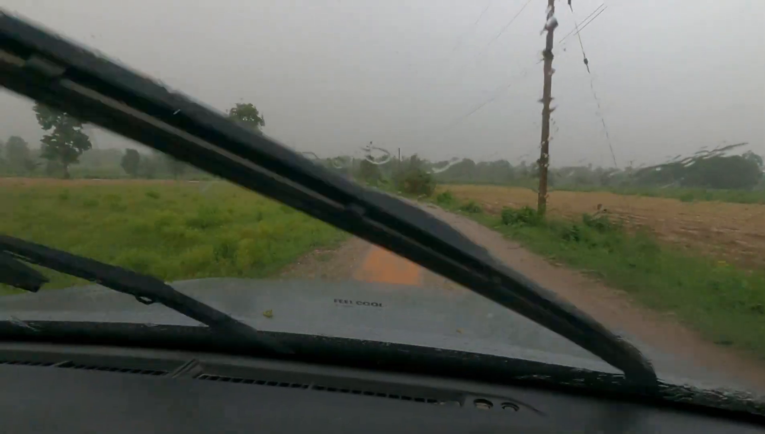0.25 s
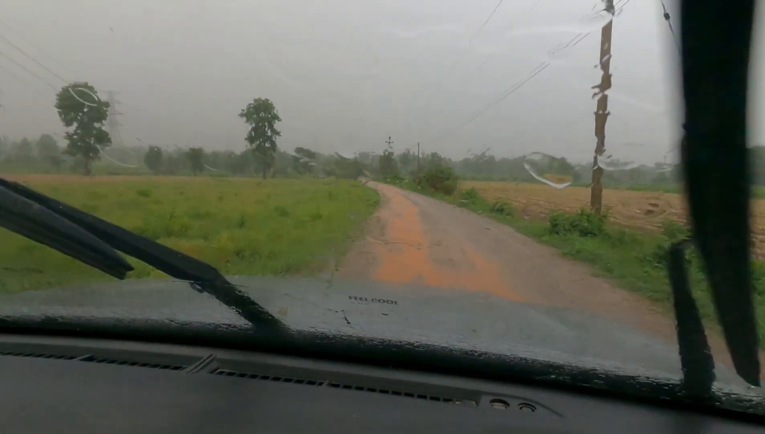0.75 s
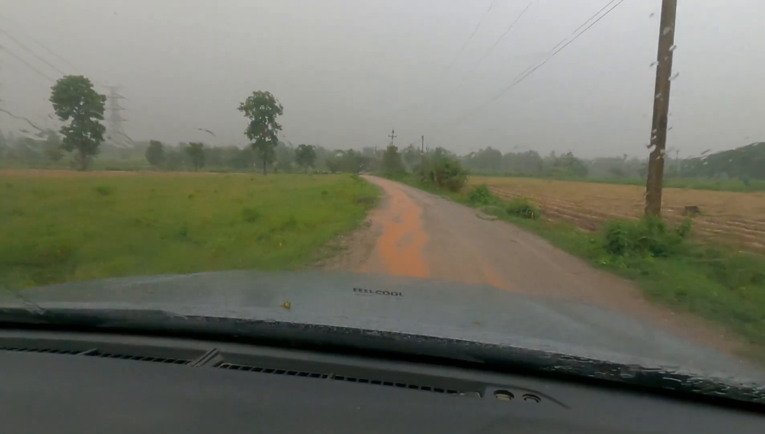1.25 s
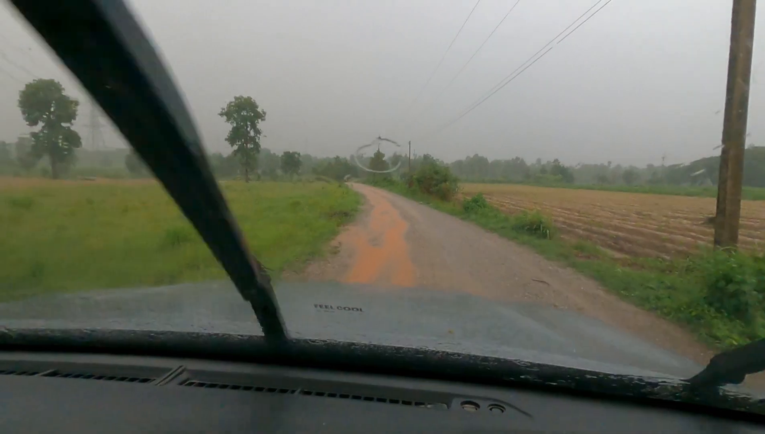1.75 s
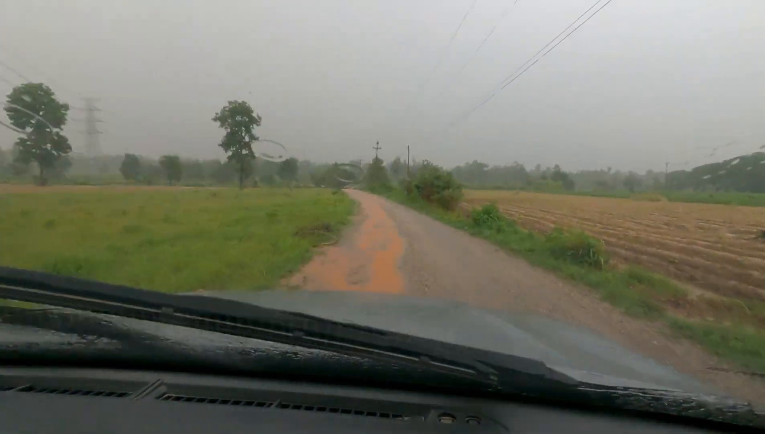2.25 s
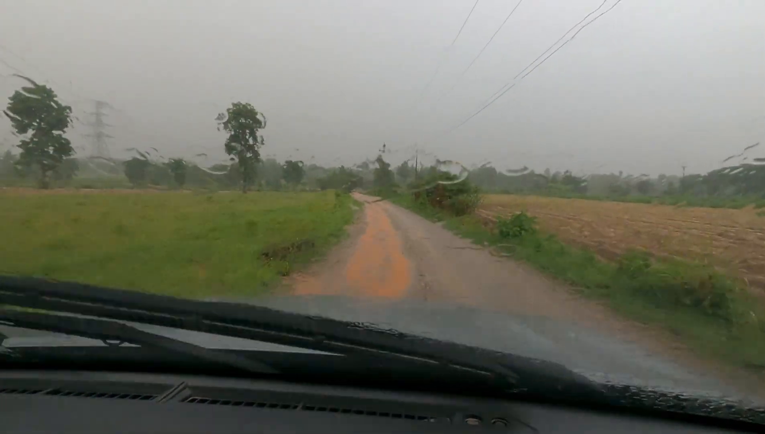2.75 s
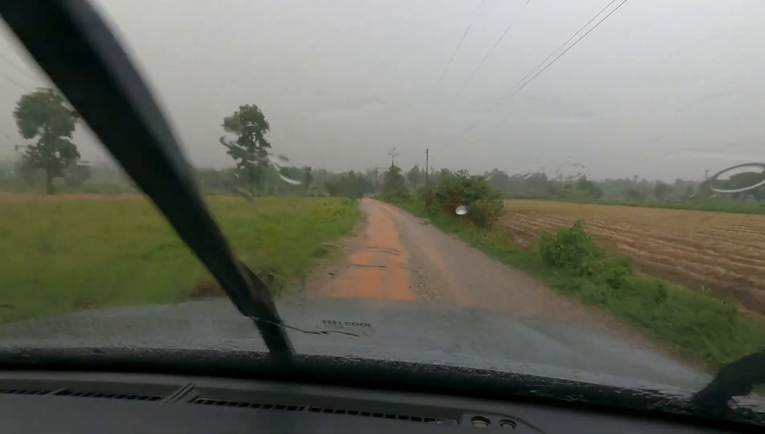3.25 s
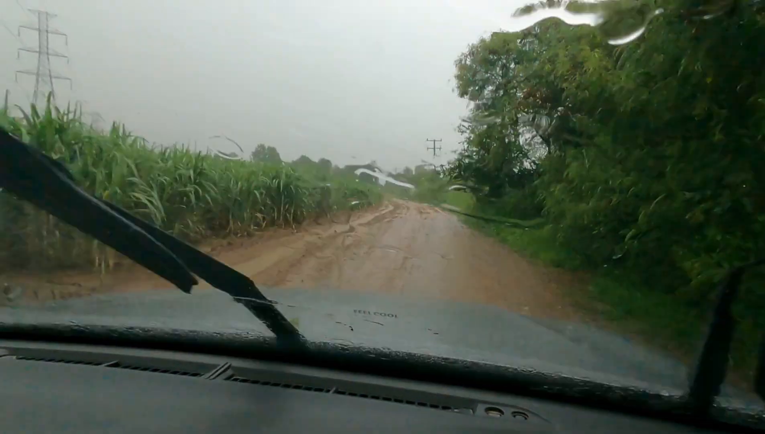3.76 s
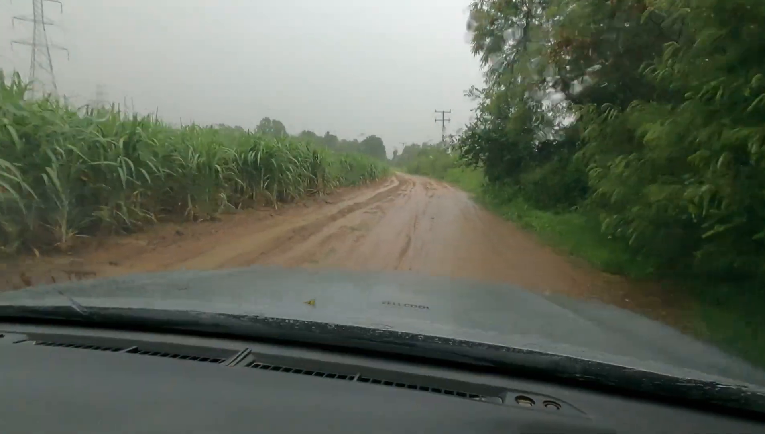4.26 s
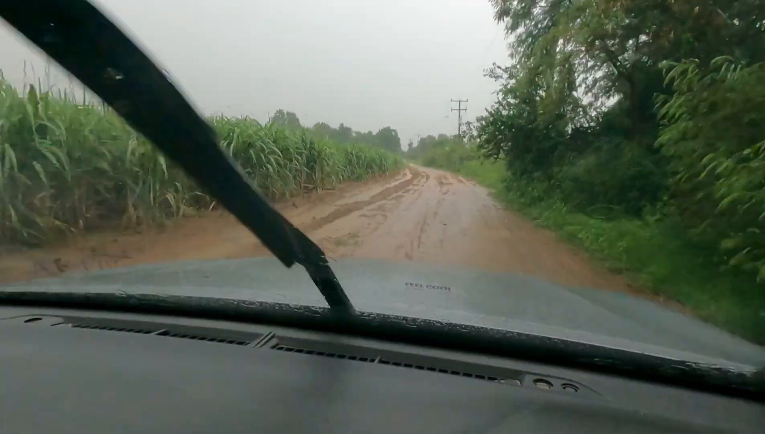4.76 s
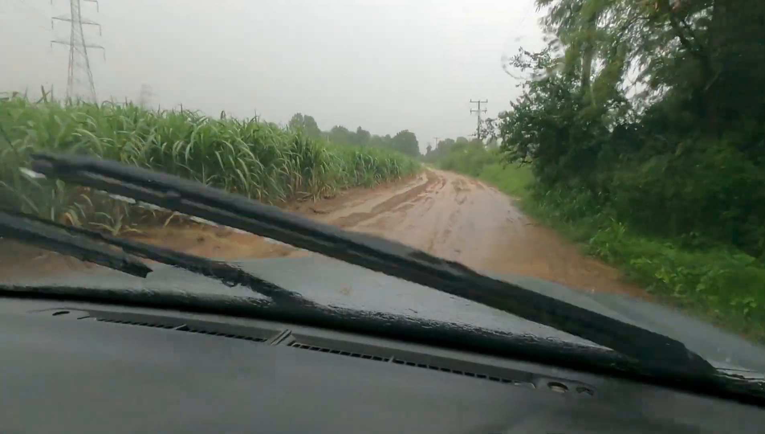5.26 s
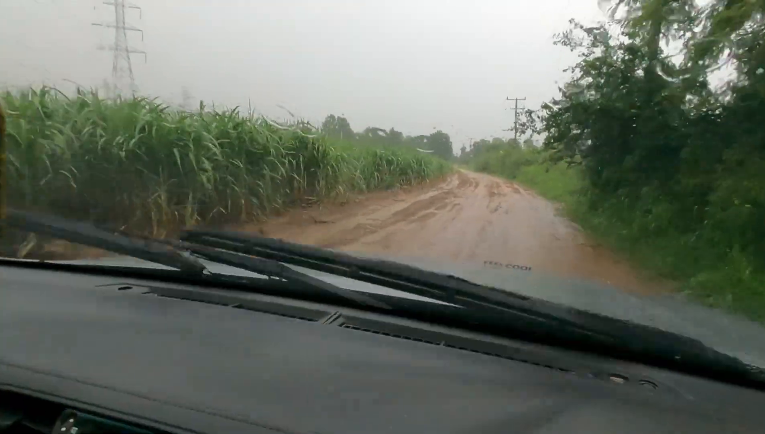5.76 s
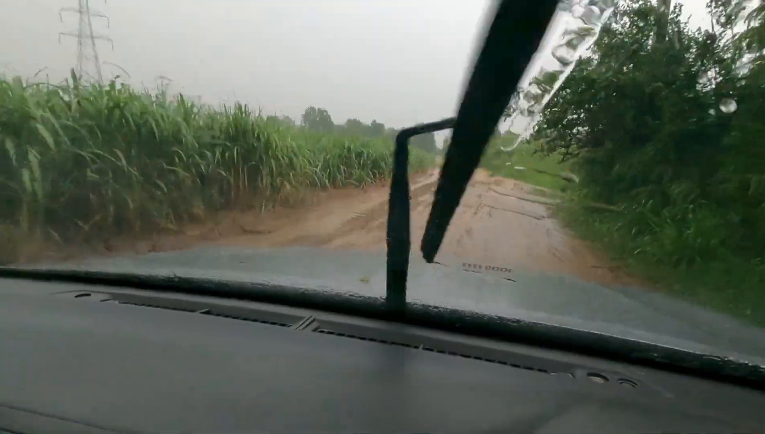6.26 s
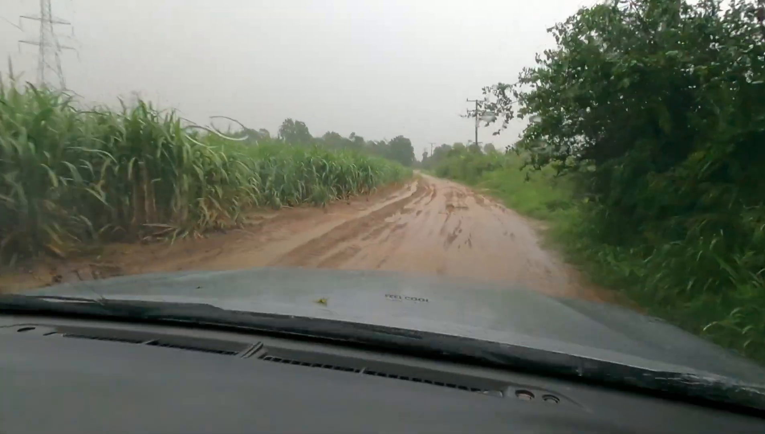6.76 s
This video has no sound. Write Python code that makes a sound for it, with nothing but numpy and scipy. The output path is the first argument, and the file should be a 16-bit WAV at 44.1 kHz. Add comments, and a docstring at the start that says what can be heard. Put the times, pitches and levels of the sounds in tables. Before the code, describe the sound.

From 0 s, steady heavy rain fills a small, padded car cabin, heard from the dashboard: a dense, fairly smooth hiss with thousands of tiny splashes and ticks, over a low, loosely wavering engine hum around 40 Hz and its multiples. Dull, quick double knocks of wipers land at about 0.9, 2.2 and 3.5 s, with slight boom swells about 0.6 s before each. Soft low thuds appear now and then; very faint high rubber hiss comes around 1.8-2.4 s. Larger drops cluster near 2.8-3.0 s. At 3.73 s everything cuts to silence, except a few milliseconds of thin rain at 3.89 s. From 4.0 s a louder, fuller stretch fades in within 0.06 s, strongest around 4.2-4.6 s, with crisp drops and an engine boom peaking near 4.3 s. It then eases, with wiper knocks at 5.2 and 6.55 s and scattered drops until the end, about 7 s.

```python
"""Inside a car crawling along a dirt road in heavy rain: coloured noise and thousands of tiny splashes make the
wash, pitched rings with short spatters make the nearer drops, and drifting low tones make the engine boom.
Wipers knock by ringing a panel at the foot of each sweep; wet rubber hisses, and short low rings make soft thuds.
Midway the sound cuts out, a sliver slips through, and a louder stretch of road fades in."""
import sys
import numpy as np
from scipy import signal
from scipy.io import wavfile
from scipy.ndimage import uniform_filter1d

SR = 44100
rng = np.random.default_rng(int(sys.argv[2]) if len(sys.argv) > 2 else 0)


def generate_wav(signal):
    """Clip the signal to [-1, 1] and save it as 16-bit WAV at the path in sys.argv[1]."""
    frames = np.transpose(np.atleast_2d(signal))
    scaled = np.clip(frames, -1, 1) * 32767
    pcm = np.round(scaled).astype(np.int16)
    wavfile.write(sys.argv[1], SR, pcm)


N = 309141
SLIVER_END_S = 3.8908  # the second stretch of road takes over the rain colour here

# how hard it rains, one table a stretch of road: start_s, level_db,
# low_db (tilt under about 900 Hz), spray_db (tilt around 7 kHz)
RAIN_LEVELS = [
    [(0.0, -28, 3.5, -5), (0.2, -25, -1.5, -3), (0.74, -27, 1.5, -1), (1.2, -26.5, 1, 0.5),
     (1.75, -25.5, 0.5, 3), (2.05, -26.5, 3.5, 0.5), (2.3, -26.5, 1, 0.5), (2.5, -26.5, 1, 2.5),
     (2.65, -27, 0.5, 1.5), (2.75, -24, 0.5, 1.5), (3.0, -27, 1.5, 2), (3.35, -26, 0.5, 2),
     (3.72, -28, 1.5, 2.5), (3.86, -28.5, -12.5, 9), (3.92, -28, -9.5, 6.5)],
    [(4.0, -32, -1.5, -6), (4.1, -24, 2, -10), (4.2, -21, -1, -1), (4.27, -22.5, 1, -6),
     (4.35, -22.5, -1, 0), (4.48, -22, -1, -3), (4.6, -22.5, 0, 0), (4.72, -25, -1, 1.5),
     (5.0, -26, -0.5, -1.5), (5.4, -27.5, -2, -1.5), (5.65, -25.5, -1, -1.5), (5.78, -26, 0.5, 1.5),
     (5.88, -26, 1.5, 1), (6.05, -27.5, -1.5, 0), (6.2, -27.5, -1.5, -0.5), (6.55, -27.5, 0.5, -1),
     (7.0, -27.5, 0, -0.5)],
]
# wipers landing at the foot of a sweep: hit_s, level_db, lowest_mode_db, upper_tuning_ratio,
# first_blade_lead_s, first_blade_db (against the second), rebound_after_s, rebound_db,
# slack_lead_s (linkage taken up ahead of the first blade), slack_db, first_blade_sharpness_db
WIPER_KNOCKS = [(0.879, -11, -13, 0.94, 0.0064, -8, 0.015, -7.5, 0.0066, -14, 5),
                (2.1972, -11, -5, 0.93, 0.0044, -3.5, 0.023, -12.5, 0.008, -11, 1),
                (3.5137, -12, -11, 1.04, 0.0042, -2, 0.019, -11, 0.0095, -9.5, -1),
                (5.2333, -13.5, -2, 0.94, 0.00425, -2.5, 0.016, -6.5, 0.0093, -4.5, 1.5),
                (6.5548, -11.5, -8, 0.99, 0.0088, -8.5, 0.00267, -5.5, 0.006, -6, 6.5)]


def gain_of(db):
    """Decibels to an amplitude factor."""
    return 10 ** (np.asarray(db) / 20)


def evened(x):
    """Scales to rms 1."""
    return x / np.sqrt(np.mean(x ** 2) + 1e-20)


def read(points, hz):
    """Reads a spectrum in dB, interpolated along a log frequency axis."""
    f, value = np.transpose(points)
    return np.interp(np.log(hz + 1), np.log(f + 1), value)


def column(tables, t, order):
    """Reads one column of the joined road tables at times t."""
    rows = np.vstack(tables)
    return np.interp(t, rows[:, 0], rows[:, order])


def add(mix, s, sound):
    """Mixes a sound in at time s."""
    part = mix[round(s * SR):][:len(sound)]
    part += sound[:len(part)]


def blobs(frames, bins, long, wide):
    """A random time-frequency field of soft patches, rms 1."""
    field = rng.standard_normal((frames, bins)).T
    across_bins = uniform_filter1d(field, wide, 0)
    return evened(uniform_filter1d(across_bins, long, 1))


def ring(hz, cycles, glide, size=600):
    """A splash: soft start, a few cycles dying away, a slight pitch glide; size in samples."""
    u = np.arange(size) / SR * hz / cycles
    swell = 4 * u * np.exp(1 - 4 * u)  # peaks at 1
    return swell * np.sin(2 * np.pi * cycles * u * (1 + glide * u))


def echoed(x, t60_s=.04, wet_db=-7.):
    """The small padded cabin: a short tail of sparse reflections."""
    taps = np.zeros(4000)
    at = np.arange(40, 3980, 20) + rng.integers(0, 20, 197)
    taps[at] = rng.choice([-1., 1.], len(at)) * gain_of(-60 * at / SR / t60_s)
    tail = signal.oaconvolve(x, taps / np.linalg.norm(taps))[:N]
    return x + gain_of(wet_db) * tail


def shower(splashes_per_s=7000., ticks_per_s=200., spread_db=2.7, cycles=1.8, tick_db=-11.5, wash_db=2.0):
    """Splashes of many pitches and hard ticks over a smooth wash, before the cabin colours them."""
    size = gain_of(spread_db * np.minimum(rng.exponential(1, N), 5))
    size = size * (rng.random(N) < splashes_per_s / SR)
    kind, splashes = rng.integers(0, 32, N), np.zeros(N)
    for k, hz in enumerate(np.geomspace(1200, 9000, 32)):
        splash = ring(hz, cycles * rng.uniform(0.53, 2.14), rng.uniform(-0.25, 0.49))
        splashes += signal.oaconvolve(size * (kind == k), np.sqrt(hz) * evened(splash))[:N]

    hits = gain_of(4.0 * np.minimum(rng.exponential(1, N), 3)) * (rng.random(N) < ticks_per_s / SR)
    glass = signal.butter(2, 1200., "highpass", fs=SR, output="sos")
    ticks = gain_of(tick_db) * splashes.std() * evened(signal.sosfilt(glass, hits))

    # drops land in clumps of a few milliseconds
    clumps_db = 1.5 * evened(np.convolve(rng.standard_normal(N), np.hanning(350), "same"))
    drops = evened(echoed(gain_of(clumps_db) * (splashes + ticks)))
    return drops + gain_of(wash_db) * rng.standard_normal(N)


def level_flicker(t):
    """Small random flicker of the rain level in dB, as a sum of bell-shaped bumps."""
    # small random flicker of the rain level: middle_s, half_width_s, change_db
    bumps = [(0.08, 0.013, 2), (0.43, .015, 1), (0.6, 0.013, -1), (0.78, 0.013, -1), (1.15, .02, -1.5),
             (1.21, 0.017, 1), (1.75, .02, -3), (1.83, .02, 2), (1.93, 0.011, 1), (2.07, 0.016, -1),
             (2.27, .012, -2), (2.44, 0.011, -3), (2.54, 0.017, -1), (2.6, 0.026, 1), (2.7, 0.016, 1.5),
             (2.83, 0.011, -0.5), (2.97, 0.011, 1), (3.21, .015, 2), (3.58, .015, 1.5), (4.42, .015, -1),
             (4.71, .015, -1), (5.14, 0.03, -1), (5.37, 0.0099, -2.5), (5.46, 0.013, -0.5),
             (5.59, .015, -1), (5.74, .02, -0.5), (5.83, .012, 0.5), (5.94, 0.017, -0.5), (6.17, 0.028, -1),
             (6.23, 0.013, 0), (6.5, 0.011, 2), (6.61, 0.014, 2.5), (6.87, 0.0095, 0)]
    return sum(db * np.exp(-.5 * ((t - s) / half) ** 2) for s, half, db in bumps)


def rain(patchy_db=0.47, gusty_db=0.47, roof_hz=910.0, spray_hz=7220.0):
    """The shower through roof and glass; gusts flicker across wide bands, patches drift."""
    # colour of the rain in the cabin, one table a stretch of road: pitch_hz, density_db (dB per Hz)
    cabin_colour = [
        [(30, -4), (100, -11), (240, -7), (340, -9.5), (500, -8), (640, -12), (1250, -13), (1450, -11.5),
         (2000, -14.5), (3300, -13), (4300, -16), (5200, -21.5), (5700, -27), (6300, -33.5), (7000, -34.5),
         (7600, -37), (8450, -51), (8650, -57)],
        [(30, -9), (55, -8), (100, -6), (150, -7), (200, -6.5), (400, -3.5), (500, -5.5), (600, -6),
         (710, -4.5), (900, -9), (1250, -8.5), (1450, -9), (2500, -11.5), (3600, -10), (4900, -15.5),
         (5700, -22), (6300, -28), (7000, -37), (8450, -43), (8650, -62)],
    ]
    hz, t, z = signal.stft(shower(), SR, nperseg=1024, noverlap=768)
    # flatten the average spectrum so that the cabin alone sets the colour
    average_power = uniform_filter1d((abs(z) ** 2).mean(1), size=3)
    flat = z / np.sqrt(average_power)[:, None]

    colour_db = np.array([read(points, hz) for points in cabin_colour]).T
    colour_db = colour_db - 80 * (hz > 9000)[:, None]
    shape_db = colour_db[:, (t > SLIVER_END_S).astype(int)]

    roof = 1 / (1 + (hz / roof_hz) ** 4)
    spray = 1 / (1 + ((hz - spray_hz) / 850.) ** 4)
    shape_db = shape_db + np.outer(roof, column(RAIN_LEVELS, t, order=2))
    shape_db = shape_db + np.outer(spray, column(RAIN_LEVELS, t, order=3))

    patches = blobs(len(t), len(hz), long=10, wide=16)
    gusts = blobs(len(t), len(hz), long=3, wide=120)
    shape_db = shape_db + patchy_db * patches + gusty_db * gusts
    shape_db = shape_db + np.outer(1 - roof, level_flicker(t))  # the flicker spares the lows

    body = signal.istft(flat * gain_of(shape_db), SR, nperseg=1024, noverlap=768)[1][:N]
    return evened(body) * gain_of(column(RAIN_LEVELS, np.arange(N) / SR, order=1))


def big_drops(cycles=5.6, tail_db=3.0, tail_s=0.0043, spread=1.6, top_hz=5570.0):
    """Each large drop ticks on the glass and spatters around its own pitch; its top is cut away steeply."""
    # large single drops: start_s, level_db (of the tick), pitch_hz
    drop_hits = [(0.6783, -24, 3300), (0.7213, -25, 3260), (1.02, -26, 1480), (1.631, -23, 3350),
                 (1.958, -23.5, 3380), (2.296, -22, 3540), (2.36, -24, 3800), (2.405, -22.5, 3400),
                 (2.752, -22, 1800), (2.838, -22, 2600), (2.862, -24.5, 3600), (2.9778, -17, 3200),
                 (2.9, -27, 5200), (2.987, -27, 4100), (3.0046, -20, 1950), (3.0256, -21.5, 3500),
                 (3.167, -28.5, 1160), (4.078, -24.5, 1340), (4.161, -28, 1580), (4.203, -17, 3460),
                 (4.304, -13.5, 3700), (4.3181, -17, 2200), (4.352, -23, 1550), (4.4343, -17, 2920),
                 (4.575, -16.5, 1420), (4.697, -26, 1100), (4.829, -17, 2650), (5.003, -20, 2490),
                 (5.262, -17.5, 3650), (5.293, -25, 1430), (5.536, -29, 1490), (5.592, -16.5, 3040),
                 (5.628, -27, 1320), (5.7244, -19.5, 4600), (5.7438, -21, 1420), (5.829, -25, 2300),
                 (5.832, -19, 4470), (5.86, -28, 4200), (5.89, -19, 2640), (5.916, -25, 1490),
                 (6.14, -21, 4300), (6.393, -18, 4300), (6.539, -16.5, 2550), (6.8224, -25, 1500),
                 (6.862, -22, 3600), (6.873, -17.5, 2940)]
    out, t = np.zeros(N), np.arange(900) / SR
    for (s, db, hz), noise in zip(drop_hits, rng.standard_normal((len(drop_hits), 900))):
        band = signal.butter(2, [hz / spread, hz * spread], "bandpass", fs=SR, output="sos")
        spatter = signal.sosfilt(band, noise * np.exp(-t / tail_s))
        add(out, s, gain_of(db) * ring(hz, cycles, 0.019, size=900))
        add(out, s, gain_of(db + tail_db) * spatter)
    dull = signal.cheby2(8, 50, top_hz * 1.3, fs=SR, output="sos")
    return signal.sosfilt(dull, echoed(out))


def engine(firing_hz=39.96, middle_db=-40., sweep_s=1.25, turn_db=9.5, turn_s=0.073):
    """Multiples of the firing rate; the cabin booms on the upper ones, steadily under load, loosely otherwise."""
    # engine load, one table a stretch of road: start_s, boom_db, third_order_db (extra weight)
    engine_load = [
        [(0, -43.5, 3), (.4, -47.5, -2), (.57, -44, -4), (.72, -55, -4), (1.05, -56, 4), (1.25, -42, 0),
         (1.4, -57, 6), (1.75, -54, -2), (2.05, -39, 1), (2.5, -65, 1), (3.3, -49, -2), (3.7, -45, -4)],
        [(4.1, -37, -2), (4.21, -35, 6), (4.29, -22, -5), (4.38, -30, 5), (4.56, -34, -8), (4.62, -49, 0),
         (4.7, -38, 3), (4.9, -33.5, 2), (5.1, -40, 2), (5.25, -49, -2), (5.55, -41, -8), (5.75, -44, -2),
         (6.15, -45, -2), (6.4, -42, -1), (6.7, -38, 1), (7.0, -43.5, -3)],
    ]
    # orders: multiple, level_db (against middle_db, at middle load),
    # looseness_hz (width of each of two smoothers in a row), follow (of the load, 0-1)
    firing_orders = [(1, -8, 7.4, 0.15), (2, -5, 13, 0.05), (3, 1, 33, 0.37), (4, 3.5, 32, 0.66)]
    t, out = np.arange(N) / SR, np.zeros(N)
    # the boom swells as the wipers turn over at the top of the glass, half a sweep before the knock
    turning = sum(np.exp(-.5 * ((t - s + sweep_s / 2) / turn_s) ** 2) for s, *_ in WIPER_KNOCKS)
    load_db = column(engine_load, t, order=1) + turn_db * turning
    third_db = column(engine_load, t, order=2)
    steady = np.clip((load_db + 43) / 9, .15, .9)  # the share of pure tone grows with load

    drift = uniform_filter1d(uniform_filter1d(rng.standard_normal(N), size=9000), size=9000)
    turns = np.cumsum(firing_hz * (1 + 0.01549 * evened(drift))) / SR
    for multiple, db, width, follow in firing_orders:
        r = np.exp(-np.pi * width / SR)
        loose = rng.standard_normal(N) + 1j * rng.standard_normal(N)
        for _ in range(2):
            loose = signal.lfilter([1 - r], [1, -r], loose)
        wander = np.sqrt(steady) + np.sqrt(1 - steady) * loose / loose.std()
        tone = wander * np.exp(2j * np.pi * multiple * turns)
        level_db = db + middle_db + follow * (load_db - middle_db) + (multiple == 3) * third_db
        out += gain_of(level_db) * tone.real
    return out


def wipers(push_s=0.00012, low_hz=128.0, dull_db=9.5):
    """Each blow is a soft push that rings the panel below the glass; the panel radiates no deep bass."""
    # modes of the panel under the wipers: pitch_hz, level_db, t60_s
    panel_modes = [(171, -6, 0.06), (255, -6, 0.024), (397, 4, 0.033), (565, -3, 0.027), (710, -15, 0.014),
                   (913, -14.5, 0.012)]
    t, out = np.arange(5000) / SR, np.zeros(N)
    for (s, db, weight_db, tuning, lead, first_db, rebound_s, rebound_db,
         slack_s, slack_db, sharp_db) in WIPER_KNOCKS:
        modes = np.array([gain_of(d - 60 * t / t60) * np.sin(2 * np.pi * hz * (tuning if k else 1) * t)
                          for k, (hz, d, t60) in enumerate(panel_modes)])
        panel = gain_of(db) * (gain_of(weight_db) * modes[0] + modes[1:].sum(0))
        # the first blade and the rebound land duller, with extra lowest mode
        low = gain_of(db + dull_db) * modes[0]
        add(out, s - lead - slack_s, gain_of(slack_db) * panel)
        add(out, s - lead, gain_of(first_db) * (gain_of(sharp_db) * panel + low))
        add(out, s, panel)
        add(out, s + rebound_s, gain_of(rebound_db) * (panel + low))
    push = np.exp(-.5 * (np.arange(-60, 61) / SR / push_s) ** 2)
    out = np.convolve(out, push / push.sum(), "same")
    return signal.sosfilt(signal.butter(2, low_hz, "highpass", fs=SR, output="sos"), out)


def whispers(low_hz=10200., high_hz=12400.0):
    """Wet rubber whispering on the glass: short swells of narrow, very high hiss."""
    # strokes: start_s, length_s, level_db
    strokes = [(1.79, .07, -75), (1.88, .08, -75), (1.94, .11, -72.5), (2.36, .08, -68)]
    level = np.zeros(N)
    for s, length, db in strokes:
        add(level, s, gain_of(db) * signal.windows.tukey(round(length * SR), .6))
    band = signal.butter(4, [low_hz, high_hz], "bandpass", fs=SR, output="sos")
    return level * evened(signal.sosfilt(band, rng.standard_normal(N)))


def thuds(cycles=4.3):
    """Each thud is a few soft low cycles that swell and die away."""
    # soft low thuds; the one at 3.885 is a low push that gives the sliver its bass:
    # start_s, level_db, pitch_hz
    low_hits = [(0.279, -26, 257), (0.539, -24, 148), (0.84, -25, 220), (1.184, -26, 156), (1.52, -30, 139),
                (1.585, -26.5, 157), (2.835, -24, 237), (2.862, -25, 158), (3.885, -30, 340),
                (4.645, -22, 149), (4.834, -27, 133), (5.824, -22, 363), (5.958, -24, 154),
                (6.001, -23, 420), (6.916, -24, 286)]
    out = np.zeros(N)
    for s, db, hz in low_hits:
        add(out, s, gain_of(db) * ring(hz, cycles, -0.016, size=4000))
    return out


def fizz(patchy_db=3.5, under_rain_db=-49.5):
    """Faint patchy hiss that tops the rain and follows its level."""
    # thin fizz above the steep edge near 8.5 kHz: pitch_hz, density_db (dB per Hz)
    fizz_colour = [(8000, -2), (9500, 0.5), (10900, 1), (12000, -5), (13500, -10), (15300, -14.5)]
    hz, t, z = signal.stft(rng.standard_normal(N), SR, nperseg=256)
    shape_db = read(fizz_colour, hz)[:, None] - 80 * (hz < 8500)[:, None]
    shape_db = shape_db + patchy_db * blobs(len(t), len(hz), long=6, wide=8)
    top = signal.istft(z * gain_of(shape_db), SR, nperseg=256)[1][:N]
    return evened(top) * gain_of(under_rain_db + column(RAIN_LEVELS, np.arange(N) / SR, order=1))


def scene():
    """All sources summed at one microphone on the dashboard."""
    return (rain() + big_drops() + engine() + wipers() + whispers() + thuds() + fizz())[None]


def record(dry, cut_s=3.7266, sliver_s=3.8846, fade_s=4.010, fade_length_s=.064, edge_hz=15450):
    """Bass roll-off of the microphone, the hard cut, the sliver, the fade-in, then the band limit."""
    thin = signal.sosfilt(signal.butter(3, 25., "highpass", fs=SR, output="sos"), dry)
    t = np.arange(N) / SR
    fade = np.sin(np.pi / 2 * np.clip((t - fade_s) / fade_length_s, 0, 1)) ** 2
    # the sliver opens hard and closes in under a millisecond
    sliver = (t > sliver_s) * np.clip((SLIVER_END_S - t) / 0.0005, 0, 1)
    gate = (t < cut_s) + gain_of(2.0) * sliver + fade
    band_limit = signal.firwin(511, edge_hz, window=("kaiser", 9), fs=SR)
    return signal.oaconvolve(thin * gate, band_limit[None], "same")


dry = scene()
out = record(dry)
generate_wav(out)
```